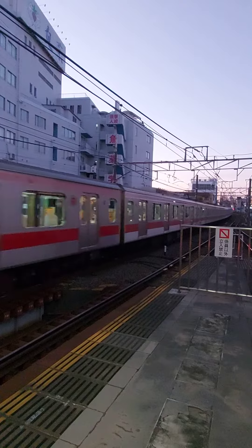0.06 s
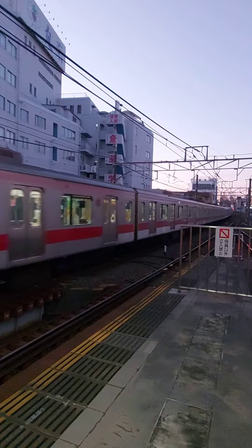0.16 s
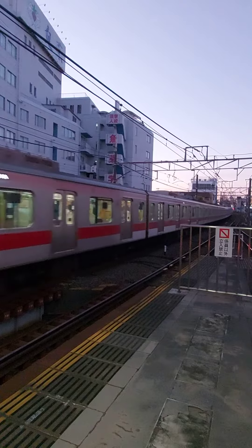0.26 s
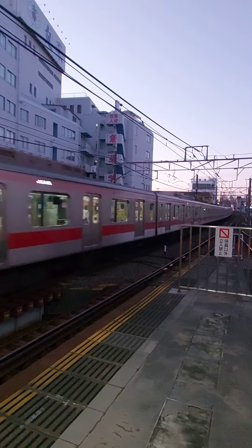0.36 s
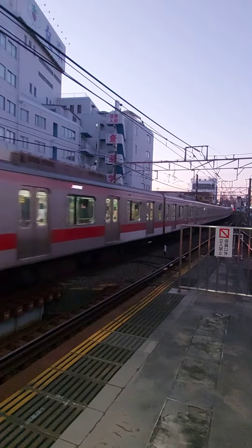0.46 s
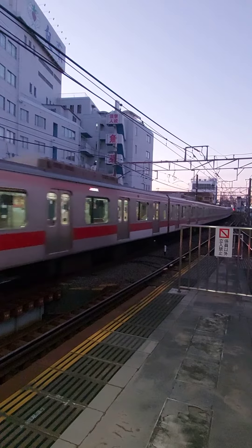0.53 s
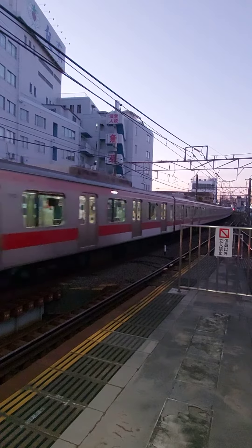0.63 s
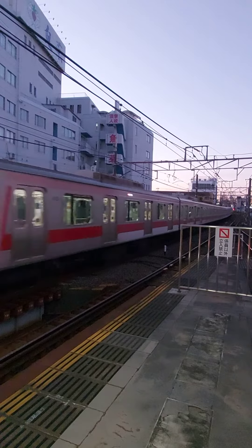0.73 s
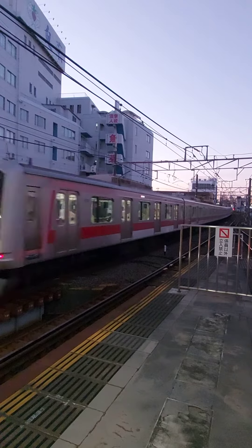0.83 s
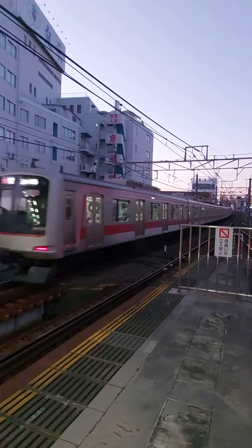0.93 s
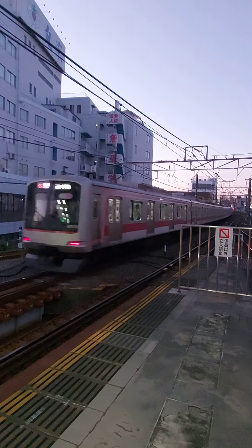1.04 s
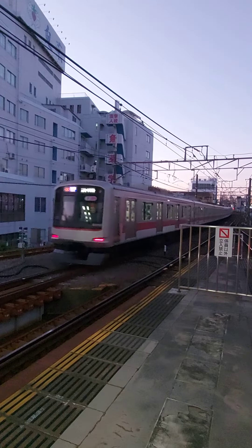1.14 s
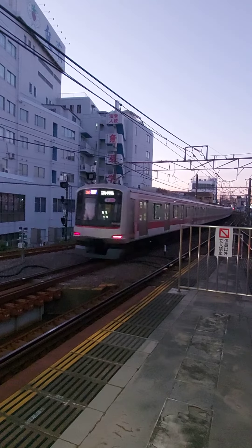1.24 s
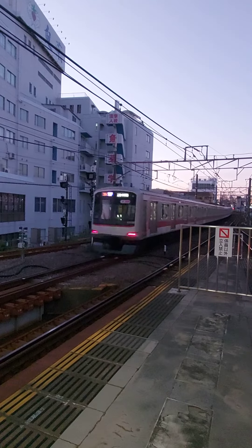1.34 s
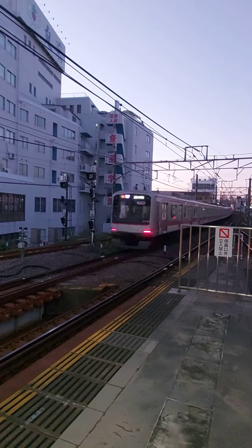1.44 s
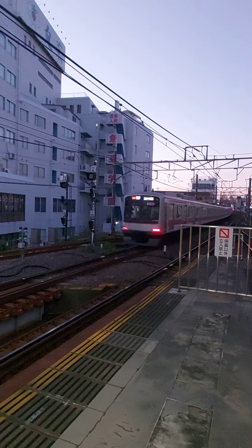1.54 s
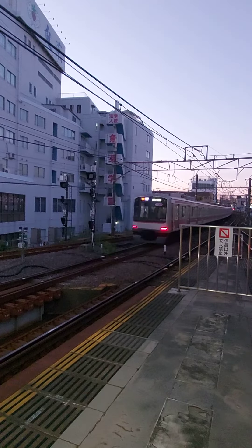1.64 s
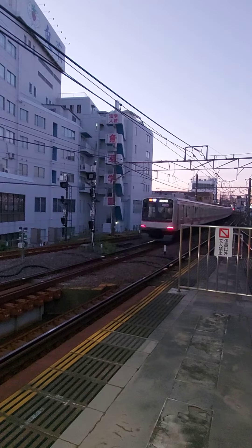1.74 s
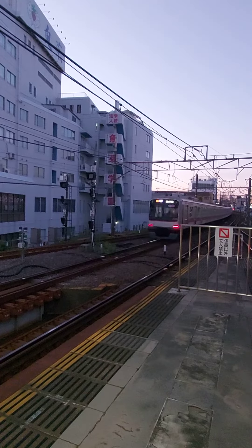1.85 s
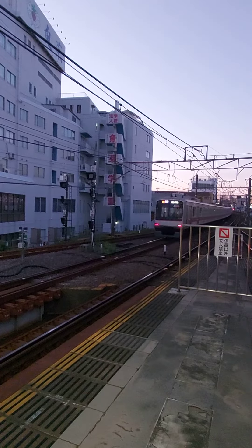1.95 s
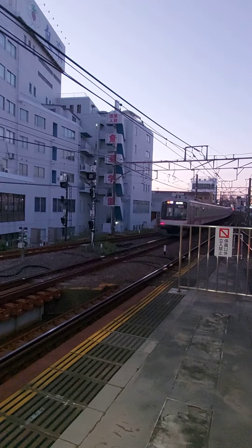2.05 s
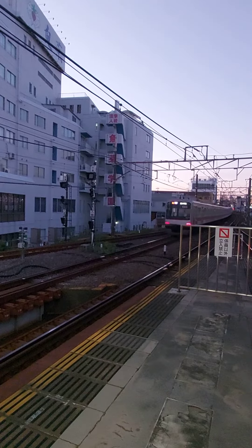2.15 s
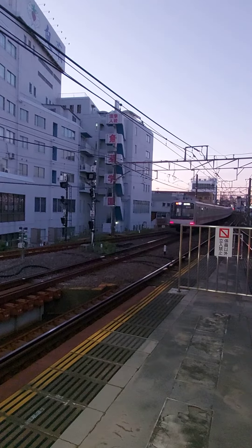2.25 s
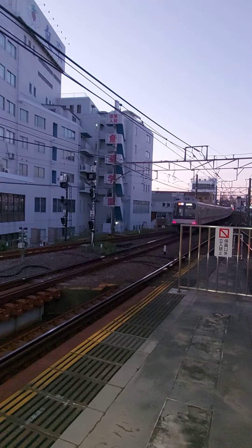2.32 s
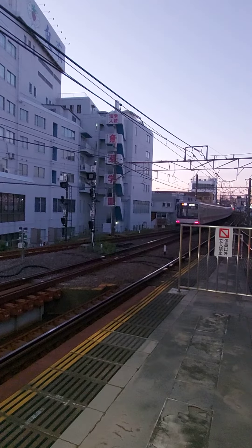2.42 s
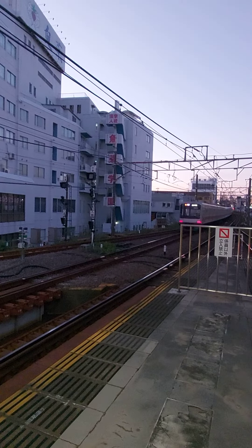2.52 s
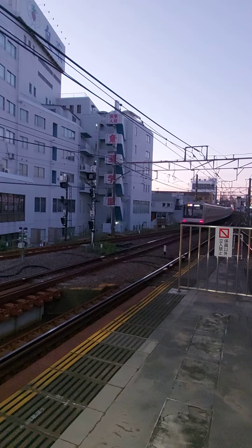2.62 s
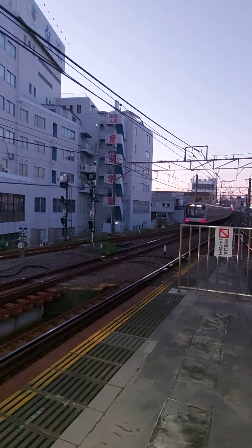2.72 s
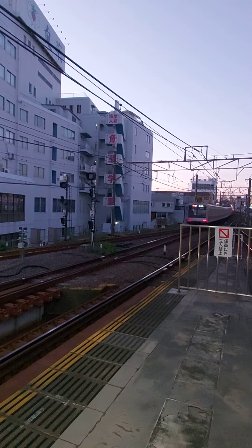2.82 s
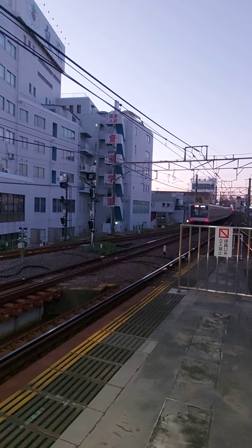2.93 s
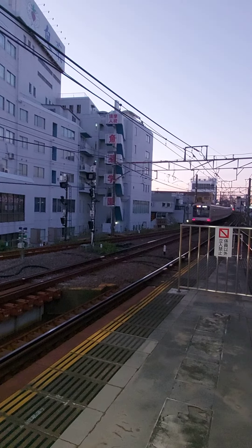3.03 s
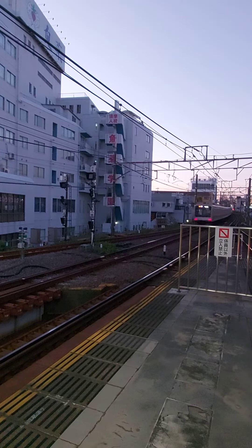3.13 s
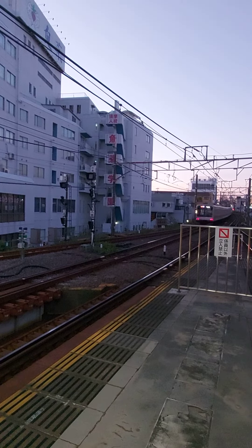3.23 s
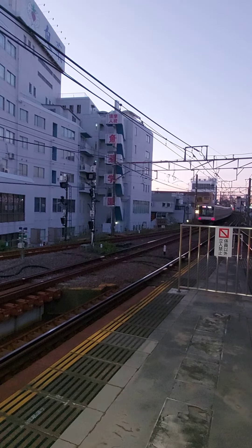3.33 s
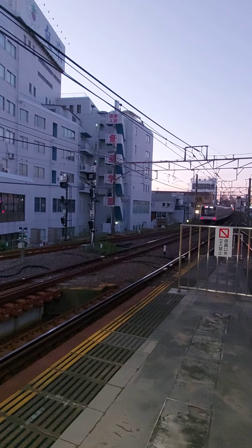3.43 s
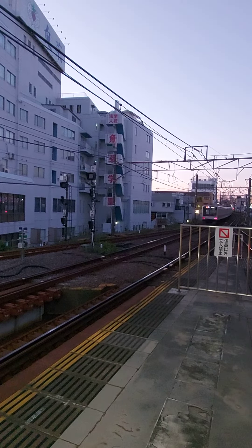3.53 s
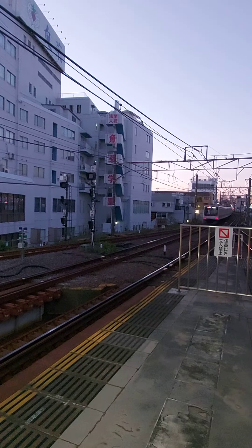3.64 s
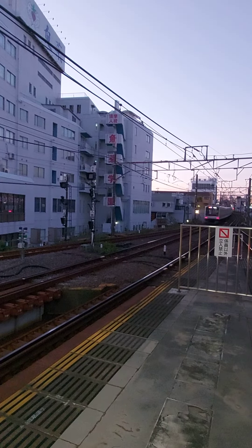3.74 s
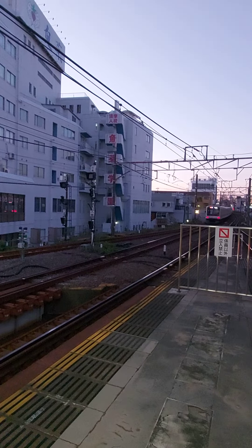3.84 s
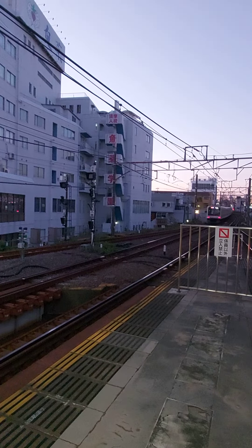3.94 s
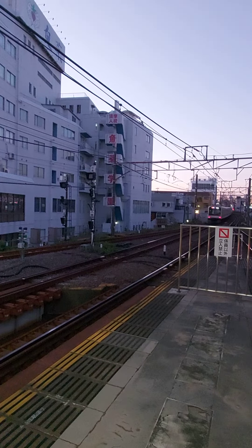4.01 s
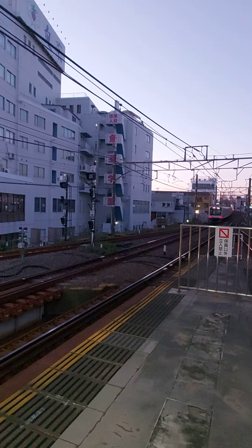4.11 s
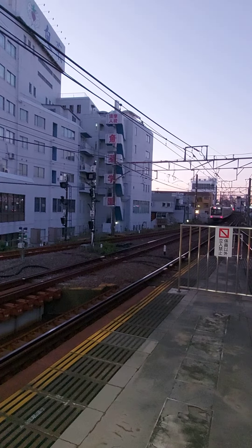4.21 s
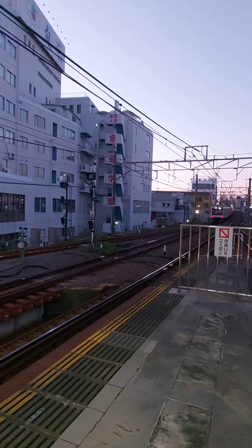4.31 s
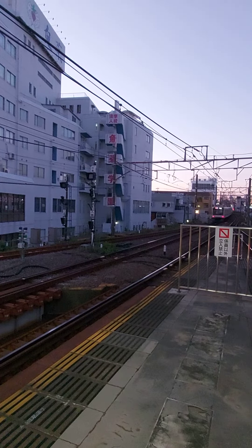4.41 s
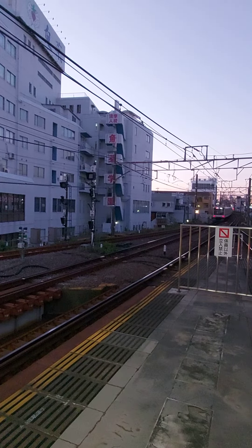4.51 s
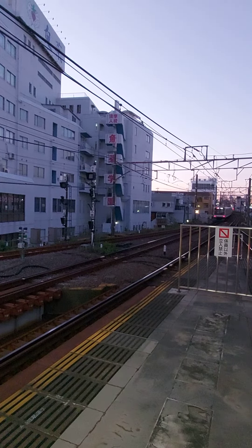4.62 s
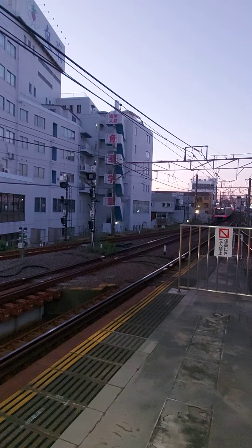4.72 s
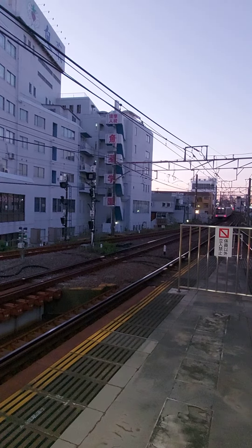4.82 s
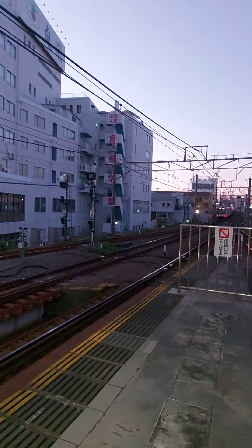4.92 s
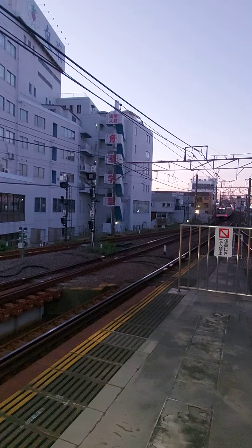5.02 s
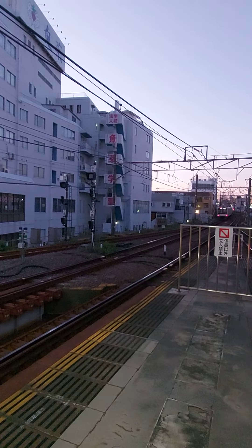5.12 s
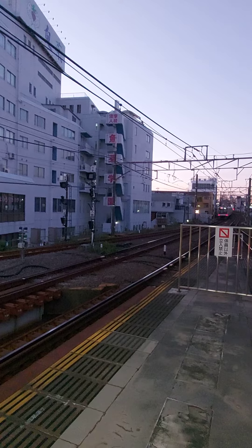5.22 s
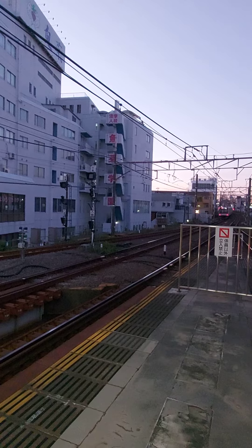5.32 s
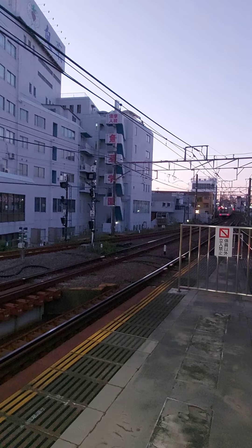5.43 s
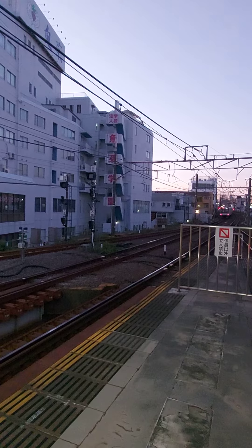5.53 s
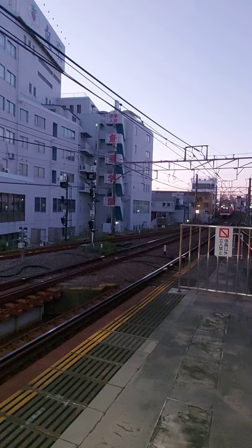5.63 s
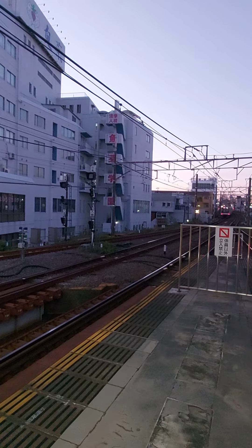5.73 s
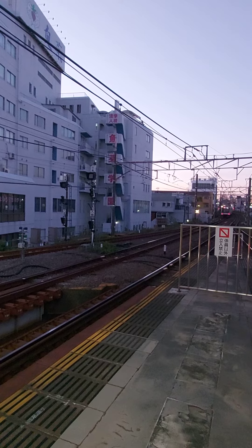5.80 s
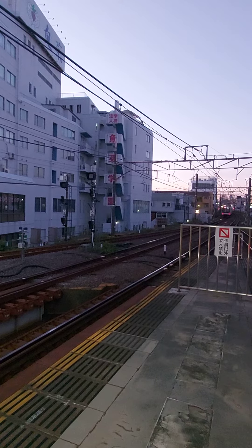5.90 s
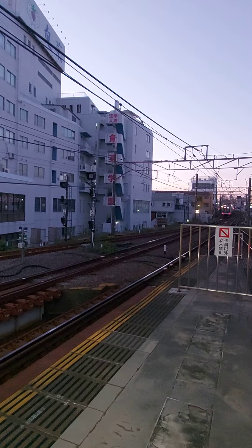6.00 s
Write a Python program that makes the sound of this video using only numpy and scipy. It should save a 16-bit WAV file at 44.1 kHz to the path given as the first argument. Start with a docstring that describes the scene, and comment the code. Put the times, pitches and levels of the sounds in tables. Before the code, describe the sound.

The last cars of a commuter train rumble by and clack away over the points, followed by a low hum and an air burst.

```python
"""An electric train rolls its last cars past a platform and away over the points.
Rough wheels and rails roar and ring at their resonances, while the car bodies drone and the ground
rumbles. Axles strike the rail joints in pairs, sharp when near and smeared when far, and the track
bed booms under the points. Near the end a low hum swells and an air valve blows off close by.
The town hums behind it all."""
import sys
import numpy as np
from scipy import signal
from scipy.fft import rfft, irfft, next_fast_len
from scipy.io import wavfile
from scipy.ndimage import uniform_filter1d

SR = 44100
rng = np.random.default_rng(int(sys.argv[2]) if len(sys.argv) > 2 else 0)


def persist_wave(psi):
    """Save psi, clipped to +-1, as 16-bit WAV."""
    counts = np.round(np.clip(psi, -1, 1) * 32767).astype(np.int16)
    wavfile.write(sys.argv[1], SR, np.atleast_2d(counts).T)


N = 267246
T = np.arange(N) / SR
FFT_SIZE = next_fast_len(N + 4096)
HZ = np.arange(FFT_SIZE // 2 + 1) * SR / FFT_SIZE + 1e-3

# Course of the rolling noise. Each row: time in seconds, then roar, treble and boom in relative dB.
ROLL_LEVELS = [(0.0, -25, -45, -20.5), (0.3, -26, -46.5, -24.5), (0.55, -26, -45.5, -25.5),
               (0.68, -24, -44.5, -21.5), (0.92, -26, -45, -22.5), (1.02, -29.5, -46.5, -25),
               (1.35, -31.5, -46, -27), (1.82, -32, -48, -31.5), (2.1, -27.5, -43.5, -26.5),
               (2.26, -26, -46.5, -31), (2.43, -26.5, -42.5, -24), (2.55, -26.5, -47, -28.5),
               (2.8, -24, -42.5, -27.5), (3.0, -22.5, -40, -25), (3.17, -23.5, -40.5, -23.5),
               (3.3, -23.5, -41, -29), (3.42, -24.5, -46, -25.5), (3.66, -31.5, -52, -33),
               (3.9, -23.5, -40, -27.5), (4.05, -26, -45.5, -32), (4.15, -29.5, -52.5, -33),
               (4.85, -36, -56.5, -35), (5.45, -34.5, -60, -37.5), (6.06, -36.5, -55.5, -33.5)]
# Car bodies close by. Each row: time in seconds, drone pitch in Hz, level in dB.
DRONE_COURSE = [(0.0, 116, -26.5), (0.006, 116, -19), (0.116, 115.8, -20.5), (0.17, 111, -29.5),
                (0.182, 110.8, -17.5), (0.346, 111, -17.5), (0.412, 110.9, -28), (0.456, 111.3, -16.5),
                (0.548, 112.3, -26), (0.616, 119.8, -29), (0.662, 115.6, -19.5), (0.682, 117, -31),
                (0.72, 126, -18), (0.732, 128.5, -29), (0.776, 124.3, -18), (0.892, 110.5, -32),
                (0.962, 119.8, -24.5), (1.088, 124.3, -29.5), (1.22, 113.9, -29.5), (1.4, 125.8, -36)]
# Level curves. Each row: time in seconds, level in dB.
GROUND_LEVELS = [(0, -21.5), (.15, -29), (.42, -22), (.8, -26.5), (1.6, -37), (2.3, -31.5), (3.3, -32),
                 (4.1, -37), (4.7, -37), (5.3, -41.5), (6.06, -39.5)]
BED_LEVELS = [(1.4, -57), (1.7, -33.5), (2, -36), (2.4, -30), (2.7, -28), (2.95, -33), (3.1, -21.5),
              (3.3, -25.5), (3.6, -37), (3.8, -39), (3.92, -27), (4.03, -26.5), (4.15, -36), (4.35, -39.5),
              (4.7, -50.5)]  # track bed under the points
# Axles striking joints. Each row: start in seconds; knock, thud, rim and rail note in relative dB;
# rise and base decay in seconds; distance in metres.
AXLE_KNOCKS = [(0.264, -29, -29, -37, -45, 0.0068, 0.18, 7),
               (0.3878, -27, -22.5, -27.5, -40, 0.002, 0.15, 10),
               (0.437, -36, -38, -40, -50, 0.0029, 0.09, 10),
               (0.627, -24.5, -17.5, -42, -46, 0.0054, 0.16, 18),
               (0.751, -33, -19.5, -35.5, -49, 0.005, 0.11, 22),
               (1.415, -25.5, -25, -32.5, -46, 0.0033, 0.2, 1.7),
               (1.535, -28.5, -15, -34, -40, 0.0012, 0.35, 5.8),
               (2.306, -33.5, -21, -41.5, -40, 0.02, 0.18, 33), (2.415, -32, -30, -42, -45, 0.014, 0.2, 20),
               (2.78, -39, -39, -55, -38, .02, .2, 40), (3.011, -28.5, -20.5, -46, -42, 0.022, 0.085, 37),
               (3.139, -28, -19, -39, -42, 0.04, 0.12, 73), (3.71, -43, -44, -59, -35, .01, .15, 60),
               (3.86, -33.5, -25.5, -45, -44, 0.044, 0.39, 90),
               (3.99, -27, -38, -46, -40.5, 0.022, 0.19, 31),
               (4.264, -33.5, -30, -62, -44, 0.0058, 0.11, 80),
               (4.369, -33.5, -25, -55, -42.5, 0.02, 0.11, 65),
               (4.944, -30.5, -35, -46.5, -36.5, 0.02, 0.17, 85),
               (5.049, -29.5, -26.5, -54, -34, 0.012, 0.19, 69)]
KNOCK_S, KNOCK_DB, THUD_DB, RIM_DB, RAIL_DB, RISE_S, DECAY_S, DISTANCE_M = np.transpose(AXLE_KNOCKS)

# Noise spectra. Each row: frequency in Hz, relative spectral density in dB.
ROLL_SPECTRUM = [(59, -29), (80, -24), (100, -5.5), (166, -5), (326, -4), (411, -4), (726, -9),
                 (1230, -19.5), (1760, -19), (2130, -25.5), (2800, -25.5), (3610, -33), (5500, -40.5),
                 (7880, -45.5), (10400, -66.5), (13300, -80), (15500, -99)]
TOWN_SPECTRUM = [(15, -39), (25, -21), (86, 5), (331, -10), (410, -9.5), (665, 2.5), (870, -11),
                 (1530, -12.5), (1700, -14), (2170, -18), (2770, -21.5), (7290, -48.5), (15500, -80.5)]
CRACK_SPECTRUM = [(300, 13), (700, -9), (1100, 2), (1700, 3.5), (2200, -7), (4000, -14), (8500, -18),
                  (10000, -51), (15500, -48)]
JET_SPECTRUM = [(1940, -47), (3300, -9), (4160, -7), (5220, -7.5), (5610, -5), (6260, -10), (6680, -7.5),
                (7950, -1.5), (9780, -14), (11400, -11.5), (12400, -17), (15500, -21)]
# Resonances driven by noise. Each row: frequency in Hz, bandwidth in Hz, relative level in dB.
WHEEL_MODES = [(1722, 177, -2.5), (1734, 37, -1.5), (1050, 97, -1), (2780, 240, -15), (3076, 130, -12),
               (3765, 130, -17.5), (7200, 100, -29)]
PANEL_MODES = [(134.6, 38, 19), (188, 42, -1), (102, 35, -5)]
SIZZLE_MODES = [(11800, 1600, 3.5), (7200, 2700, 13.5), (14000, 3000, -4.5)]
SOIL_MODES = [(46.4, 22, 1), (68, 41, -1.5)]
RAIL_MODES = [(738, 170, 2), (584, 130, 1.5), (1090, 62, -8)]
BED_MODES = [(317, 47, -0.5), (254, 54, -1), (354, 24, -4)]
# Struck resonances. Each row: frequency in Hz, time to fall 60 dB in seconds, relative level in dB.
RIM_MODES = [(3700, 0.013, 4), (4260, 0.0082, 4), (2760, 0.027, -1), (2150, 0.03, -2), (3270, 0.017, 0),
             (5240, 0.007, -14), (7200, 0.014, -8), (8300, 0.015, -13)]
SLEEPER_MODES = [(135, 0.064, 5), (246, 0.063, -3)]

# Likeness of left and right. Each row: frequency in Hz, coherence from 0 to 1.
COHERENCE = [(30, 0.88), (150, 1), (300, 0.91), (600, 0.72), (1200, 0.52), (2500, 0.39), (10000, 0.24)]
# Path difference from the train. Each row: time in seconds, lag of the left channel in samples.
LEFT_LAG = [(0, 2), (1.5, 1.3), (2.5, -0.5), (6.06, -1)]
# Balance of the microphones. Each row: frequency in Hz, left minus right in dB.
MIC_BALANCE = [(30, -14), (60, 2), (250, -0.5), (600, 2.5), (1300, -2), (2400, -2.5), (4400, 1.5),
               (8000, -1.5), (14000, 5.5)]
# Phase between the microphones. Each row: frequency in Hz, lead of the left in radians.
MIC_PHASE = [(25, 2.6), (60, 0.91), (130, 0.25), (300, 0.074), (1000, 0.062)]


def undb(db):
    """Amplitude ratio of a level in dB."""
    return 10 ** (np.asarray(db) / 20)


def over_hz(table):
    """A (Hz, value) table interpolated over log frequency."""
    hz, value = np.transpose(table)
    return np.interp(np.log(HZ), np.log(hz), value)


def over_time(table):
    """The value columns of a (seconds, value, ..) table interpolated over time."""
    times, *columns = np.transpose(table)
    return [np.interp(T, times, column) for column in columns]


def ramp(start_s, length_s):
    """A raised-cosine rise from 0 to 1."""
    return np.sin(np.pi / 2 * np.clip((T - start_s) / length_s, 0, 1)) ** 2


def wander(rate_hz):
    """Slow fluctuation: random steps, smoothed twice."""
    hold = int(SR / rate_hz)
    steps = np.repeat(rng.standard_normal(N // hold + 1), hold)
    return uniform_filter1d(uniform_filter1d(steps, hold), hold)[:N]


def tone(hz, waver, rate_hz):
    """Frequency modulation: a sine of rms 1 whose pitch wavers by a fraction of itself."""
    pitch = hz * (1 + waver * wander(rate_hz))
    return np.sqrt(2) * np.sin(2 * np.pi * np.cumsum(pitch) / SR)


def resonances(modes):
    """Amplitude spectrum of incoherent resonances, whose powers add."""
    power = sum(undb(2 * db) / (1 + ((HZ - hz * hz / HZ) / width) ** 2) ** 2 for hz, width, db in modes)
    return np.sqrt(power)


def impulse_response(modes):
    """Free vibration after a tap: a sum of damped sines."""
    t = T[:SR // 4]
    return sum(undb(db - 60 * t / t60) * np.sin(2 * np.pi * hz * t) for hz, t60, db in modes)


def noise_spectra(coherence):
    """Left and right spectra of partly coherent white noise."""
    mid, side = rfft(rng.standard_normal((2, FFT_SIZE)))
    return np.sqrt(1 + coherence) * mid + np.sqrt(1 - coherence) * side * np.array([[1], [-1]])


def noise(gain, low_hz, high_hz, coherence):
    """Shaped stereo noise whose channel mean has rms 1 between the two frequencies."""
    spectra = noise_spectra(coherence) * gain
    power = 2 * np.sum(abs(spectra.mean(0)[(HZ > low_hz) & (HZ < high_hz)]) ** 2)
    return irfft(spectra, FFT_SIZE)[:, :N] * FFT_SIZE / np.sqrt(power)


def filtered(sound, gain):
    """Linear filtering by multiplication of spectra."""
    return irfft(rfft(sound, FFT_SIZE) * gain, FFT_SIZE)[:, :N]


def knock_envelope(peaks_db, stretch):
    """Each impact rises, decays with a weak tail and echoes once; stretch scales the decay time."""
    envelope = np.zeros(N)
    t = T[:int(0.6 * SR)]
    for start, rise, decay, peak in zip(KNOCK_S, RISE_S, DECAY_S, undb(peaks_db)):
        fall = np.log(1000) * t / (decay * stretch)
        shape = (1 - np.exp(-t / rise)) * (np.exp(-fall) + 0.14 * np.exp(-fall / 9.2))
        envelope[int(start * SR):][:len(t)] += peak * shape / shape.max()
    wall_echo = undb(-16) * np.roll(envelope, int(0.076 * SR))  # from across the tracks
    return np.hypot(envelope, wall_echo)


def rolling_roar():
    """Roughness excitation: wheels shake rail and ballast, and each knock swells the roar."""
    roar_db, treble_db, boom_db = over_time(ROLL_LEVELS)
    spectra = noise_spectra(over_hz(COHERENCE)) * undb(over_hz(ROLL_SPECTRUM))
    spectra /= np.std(irfft(spectra.mean(0) * (HZ > 400) * (HZ < 1300), FFT_SIZE))
    treble_tilt_db = treble_db - roar_db + 20 + 0.21 * wander(13)
    boom_tilt_db = boom_db - roar_db - 0.7
    jolted = np.hypot(undb(roar_db), knock_envelope(KNOCK_DB - 9.5, stretch=0.54))
    rattling = np.hypot(undb(roar_db), knock_envelope(KNOCK_DB - 1, stretch=2.6))
    roar = 0
    for hz in 60 * 2 ** np.arange(0, 8.6, 0.5):  # half-octave steps
        band = np.cos(np.clip(np.pi * np.log2(HZ / hz), -np.pi / 2, np.pi / 2)) ** 2
        treble_weight = np.clip(np.log(hz / 900) / np.log(4.5), 0, 1.4)
        boom_weight = np.clip(np.log(520 / hz) / np.log(1.9), 0, 1)
        band_db = treble_weight * treble_tilt_db + boom_weight * boom_tilt_db + 0.12 * wander(4.1)
        level = (jolted if hz < 1500 else rattling) * undb(band_db)
        roar = roar + level * irfft(spectra * band, FFT_SIZE)[:, :N]
    return roar


def wheel_singing():
    """Forced resonance: rolling and knocks drive the wheels' modes; the rail carries the ring far."""
    rolling = undb(over_time(ROLL_LEVELS)[0] - 15 + 1.7 * wander(15))
    knocked = knock_envelope(KNOCK_DB - 15 + 0.0524 * DISTANCE_M, stretch=0.69)
    return np.hypot(rolling, knocked) * noise(resonances(WHEEL_MODES), 1600, 2000, over_hz(COHERENCE))


def car_bodies():
    """Panel vibration: a drone that breaks up as the tail passes, with a fading high whine."""
    pitch_hz, drone_db = over_time(DRONE_COURSE)
    gone_s = np.clip(T - DRONE_COURSE[-1][0], 0, 2)
    drone = tone(pitch_hz, waver=0.03 + 0.16 * ramp(0.5, 0.299), rate_hz=35)
    panels = undb(-7) * noise(resonances(PANEL_MODES), 60, 300, coherence=0.87)
    whine_db = -55.5 - 9 * T + 3 * wander(9)
    whine = undb(whine_db) * noise(resonances([(5220, 300, 0)]), 4000, 7000, coherence=0.3)
    return undb(drone_db - 60 * gone_s) * (drone + panels) + whine


def wheel_sizzle():
    """Spreading loss: the wheels' sizzle fades as they recede. One short hiss stands out early on."""
    treble_db = over_time(ROLL_LEVELS)[1]
    rolling = undb(-60 + 0.96 * (treble_db - treble_db[0]) + 2.1 * wander(28))
    knocked = knock_envelope(KNOCK_DB - 36.5 - 0.12 * DISTANCE_M, stretch=1)
    distance_ratio = np.hypot(1, T / 0.85)
    sizzle = np.hypot(rolling, knocked) * undb(-27.5 * np.log10(distance_ratio))
    hiss = undb(-56) * np.exp(-((T - 0.65) / 0.047) ** 2)
    return np.hypot(sizzle, hiss) * noise(resonances(SIZZLE_MODES), 8930, 15000, coherence=0.15)


def ground_rumble():
    """Ground-borne vibration: the soil under the platform rumbles at its resonances."""
    return undb(over_time(GROUND_LEVELS)[0]) * noise(resonances(SOIL_MODES), 31, 92, coherence=1)


def town_hum():
    """Incoherent addition: far traffic and fans merge into a nearly steady noise."""
    level = undb(-32.5 + 0.27 * wander(1.38))
    return level * noise(undb(over_hz(TOWN_SPECTRUM)), 20, 16000, over_hz(COHERENCE))


def joint_cracks():
    """Impact noise: axles crack across the gaps, and air absorption dulls the far ones."""
    crack = noise(undb(over_hz(CRACK_SPECTRUM)), 1600, 9000, over_hz(COHERENCE))
    treble = filtered(crack, 1 / (1 + (7000 / HZ) ** 4))
    air_loss_db = 2 * DISTANCE_M
    dull = knock_envelope(KNOCK_DB - 10.5, stretch=0.7) * (crack - treble)
    bright = knock_envelope(KNOCK_DB - 5 - air_loss_db, stretch=0.64) * treble
    snap = knock_envelope(KNOCK_DB - 18 - air_loss_db, stretch=0.13) * crack  # steel meets steel
    return dull + bright + snap


def rim_ring():
    """Modal ringing: a first contact and a brief rattle excite the wheel rim at each joint."""
    rim = impulse_response(RIM_MODES)
    rattle = knock_envelope(RIM_DB, stretch=0.25) * noise(1, 20, 24000, coherence=0.68)
    rattled = signal.fftconvolve(rattle, rim[None] / np.linalg.norm(rim))[:, :N]
    taps = np.zeros(N)
    taps[((KNOCK_S + RISE_S) * SR).astype(int)] = undb(RIM_DB + 4)
    return rattled + signal.fftconvolve(taps, rim / abs(rim).max())[:N]


def rail_ring(note_hz=1698, note_s=0.084):
    """Guided waves: the rail carries far knocks better than air, and its own note swells and dies."""
    ring = noise(resonances(RAIL_MODES), 400, 2000, coherence=1)
    carried = knock_envelope(KNOCK_DB - 8.5 + 0.13 * DISTANCE_M, stretch=0.99) * ring
    onsets = np.zeros(N)
    onsets[(KNOCK_S * SR).astype(int)] = undb(RAIL_DB)
    swells = signal.fftconvolve(onsets, np.hanning(int(note_s * SR)))[:N]
    return carried + swells * tone(note_hz, waver=0.025, rate_hz=70)


def sleeper_thuds():
    """Pulse excitation: each blow sets sleeper and ballast ringing; a longer push sounds duller."""
    force = np.zeros(N)
    for start, db, rise in zip(KNOCK_S, THUD_DB, RISE_S):
        width = int((0.00071 + rise / 5) * SR)
        force[int((start - 0.001) * SR):][:width] = undb(db) * np.hanning(width) * 2 / width
    return signal.fftconvolve(force, impulse_response(SLEEPER_MODES))[:N]


def track_bed_boom():
    """Forced resonance: the bed booms, with a firmer note inside, as the cars cross the points."""
    boom = noise(resonances(BED_MODES), 200, 400, coherence=0.97)
    note = undb(-5) * tone(312.6, waver=0.0304, rate_hz=14)
    return undb(over_time(BED_LEVELS)[0]) * (boom + note)


def low_hum():
    """Narrow-band noise: two low bands swell into a hum near the end."""
    hum = noise(resonances([(236.5, 28, 0), (94, 16, 0)]), 60, 400, coherence=0.98)
    return undb(-34) * ramp(5.45, 0.28) * hum


def air_valve(open_s=5.485, attack_s=0.066, hold_s=0.16):
    """Jet turbulence: compressed air whistles out; the top comes late, the low part lags and lasts."""
    full_flow_s = np.clip(T - open_s - attack_s, 0, None)
    closing_s = np.clip(full_flow_s - hold_s, 0, None)
    pan_db = np.array([[1.2], [-1.2]])
    flow_db = -44 - 0.5 * full_flow_s + 0.5 * wander(24.9) + pan_db
    whistles = resonances([(5800, 220, -1.5), (2730, 230, 4)])
    jet = noise(np.hypot(undb(over_hz(JET_SPECTRUM)), whistles), 6500, 15000, coherence=0.08)
    top = filtered(jet, 1 / (1 + (12500 / HZ) ** 12))
    low = filtered(jet, 1 / (1 + (HZ / 5200) ** 12))
    middle = jet - low - top
    upper_level = ramp(open_s, attack_s) * undb(flow_db - 75 * closing_s)
    low_level = ramp(open_s, attack_s + 0.14) * undb(flow_db - 25 * closing_s)
    return upper_level * (middle + ramp(open_s + 0.03, 0.1) * top) + low_level * low


def scene():
    """Superposition of all sources; the train reaches the right side first, later the left."""
    train = rolling_roar() + wheel_singing() + track_bed_boom() + low_hum()
    train += car_bodies() + wheel_sizzle() + ground_rumble()
    train += joint_cracks() + rim_ring() + rail_ring() + sleeper_thuds()
    samples = np.arange(N)
    train[0] = np.interp(samples - over_time(LEFT_LAG)[0], samples, train[0])
    return train + air_valve() + town_hum()


def record(dry):
    """Interference: the platform's reflection cuts a notch at two unequal, band-limited microphones."""
    left_gain = undb(over_hz(MIC_BALANCE) / 2) * np.exp(0.5j * over_hz(MIC_PHASE))
    notch = 1 - 0.52 * resonances([(416, 67, 0)])
    bass_cut = 1 / (1 + (32 / HZ) ** 6)
    edge_fade = np.clip(np.minimum(T, T[::-1]) / 0.004, 0, 1)
    stereo = filtered(dry * edge_fade, notch * bass_cut * np.array([left_gain, 1 / left_gain]))
    treble_cut = signal.ellip(16, 0.2, 70, 15680, fs=SR, output="sos")
    return signal.sosfilt(treble_cut, stereo)


dry = scene()
out = record(dry)
persist_wave(out)
```